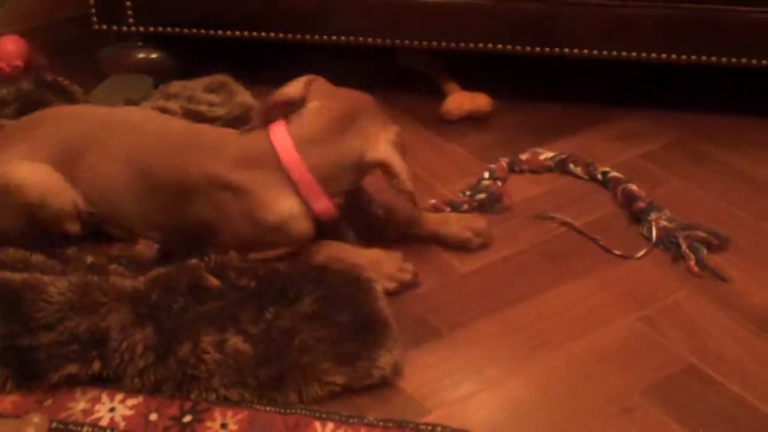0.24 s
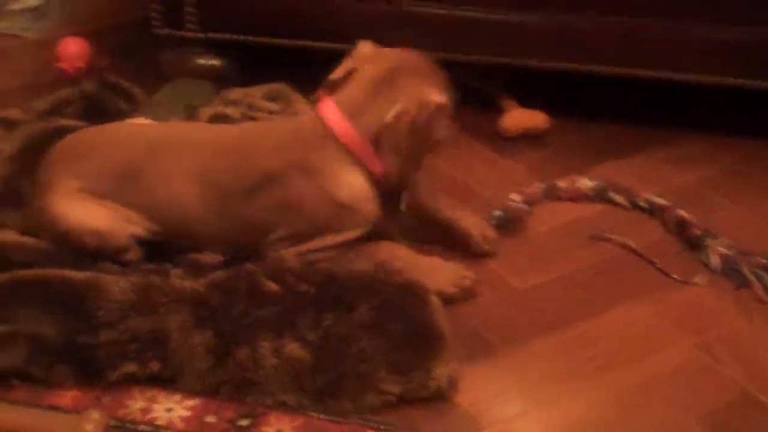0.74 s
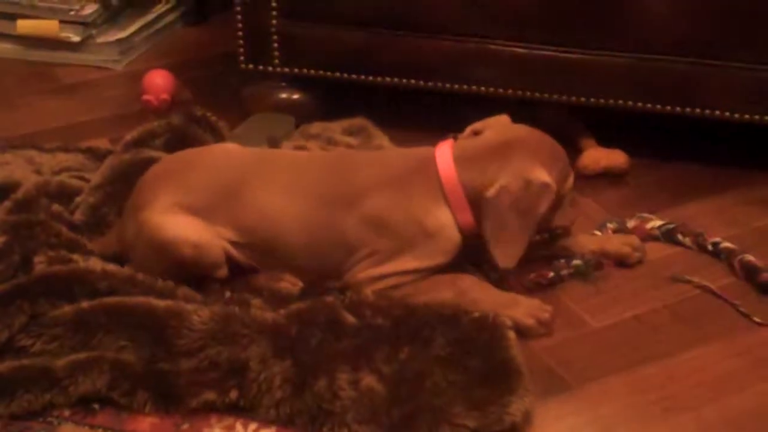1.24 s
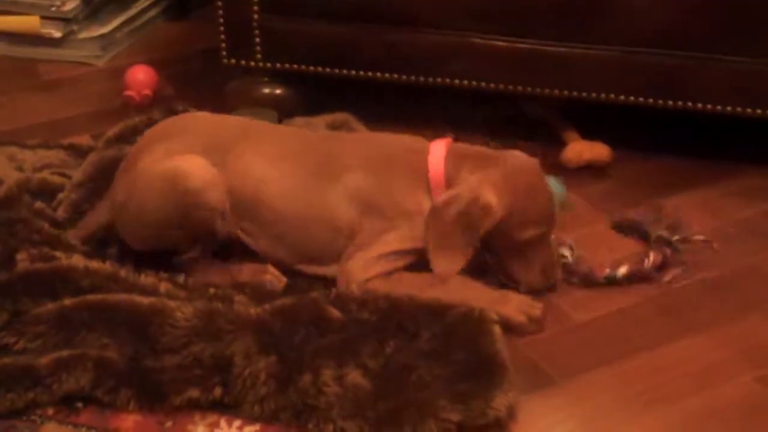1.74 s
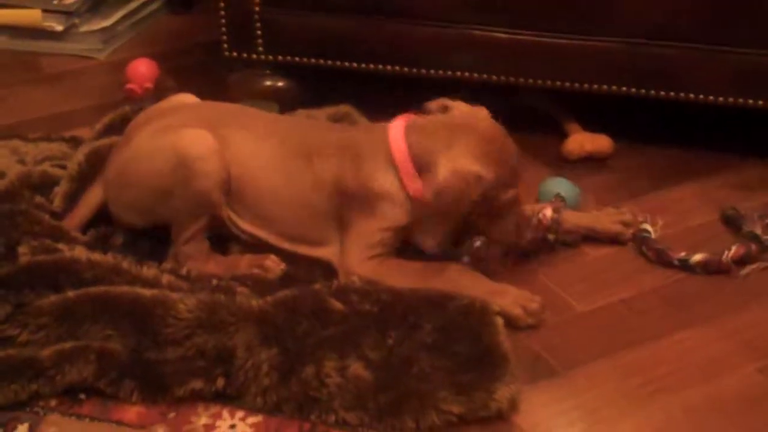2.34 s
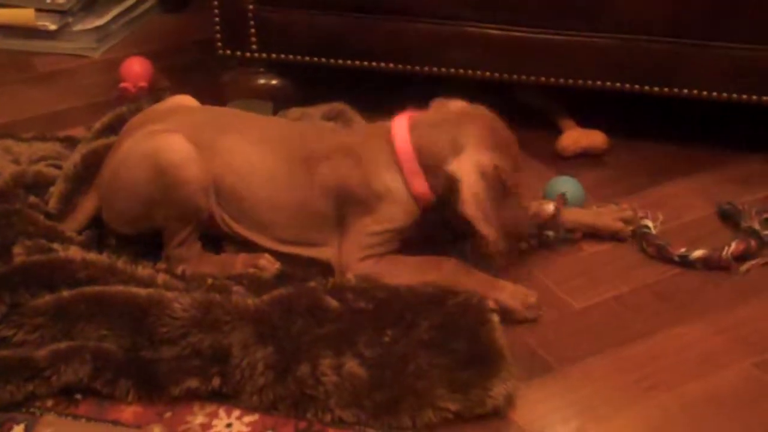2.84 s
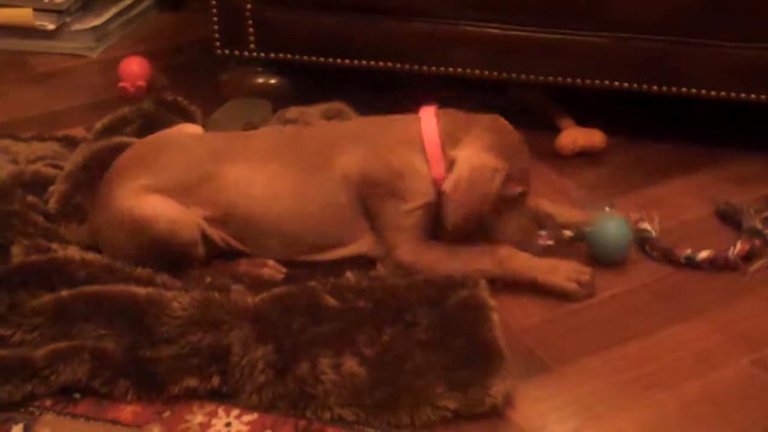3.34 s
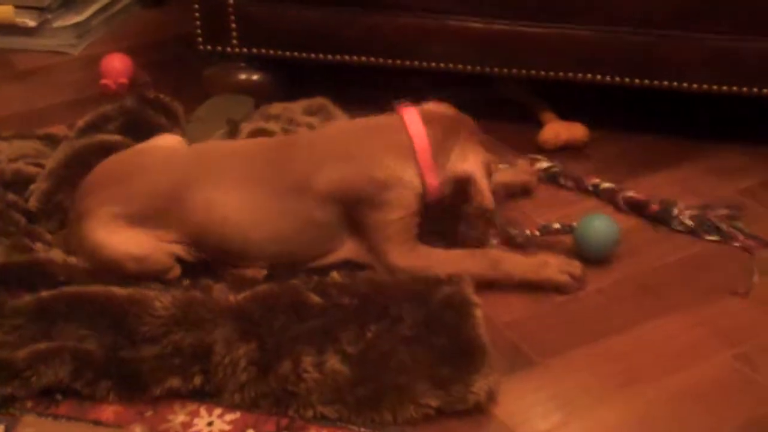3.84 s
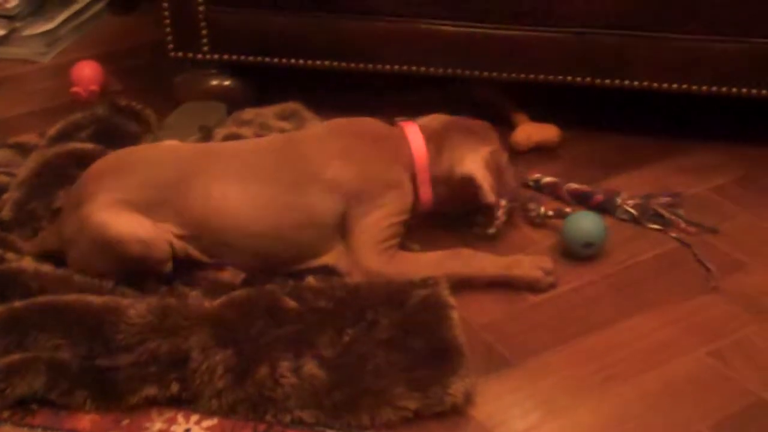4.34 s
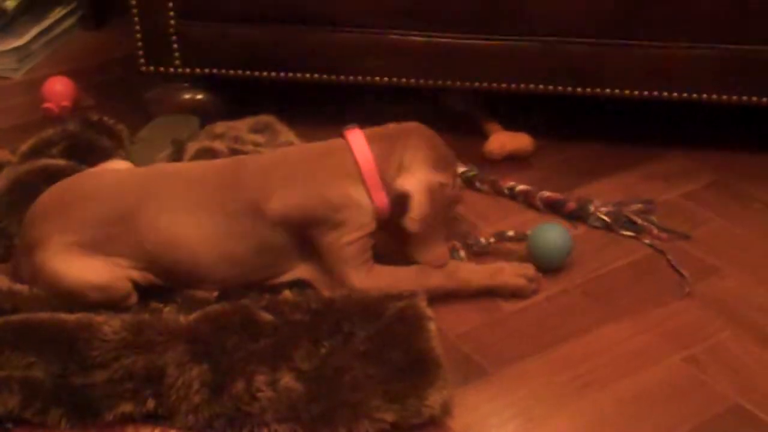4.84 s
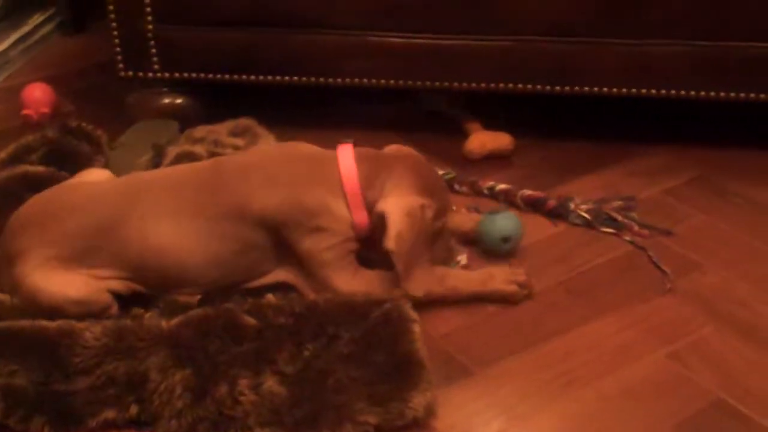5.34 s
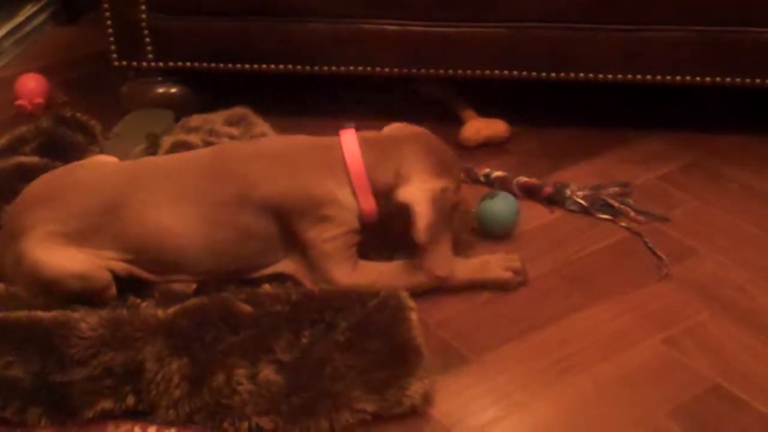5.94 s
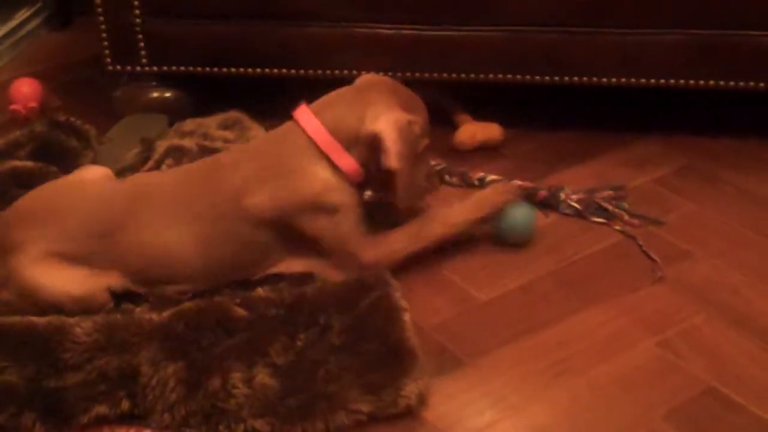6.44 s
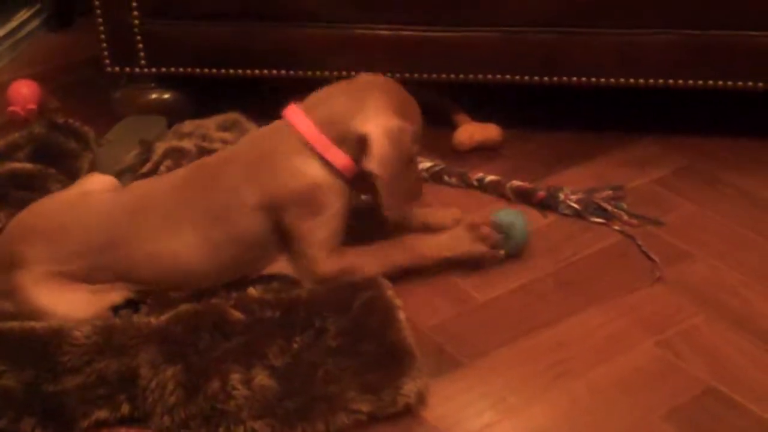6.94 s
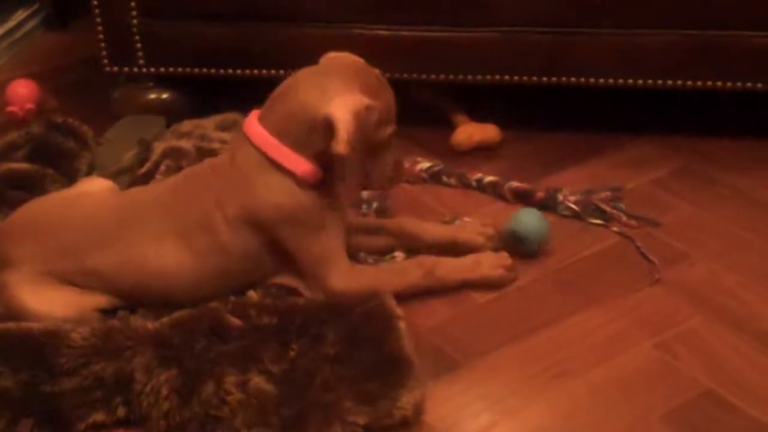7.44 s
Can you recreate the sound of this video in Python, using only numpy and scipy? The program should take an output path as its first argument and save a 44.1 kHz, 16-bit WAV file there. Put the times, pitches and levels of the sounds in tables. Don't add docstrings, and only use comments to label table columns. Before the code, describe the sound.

A puppy wriggles on a fur blanket a metre or two from the microphone. A sharp hard-ball knock comes almost at once, then busy rustling surges with raps, claw ticks and scrapes on floorboards. It thins midway, picks up in gentler bursts, swells once more after six seconds and fades to small taps. Small furnished room, low rumble and hiss.

```python
import sys
import numpy as np
from scipy import signal
from scipy.fft import rfft, irfft
from scipy.io import wavfile
from scipy.ndimage import uniform_filter1d

SR = 44100
rng = np.random.default_rng(int(sys.argv[2]) if len(sys.argv) > 2 else 0)


def ratio(d):
    e = np.asarray(d, float) / 20
    return 10 ** e


def unload_audio(sound):
    columns = np.transpose(np.atleast_2d(sound))
    steps = np.round(np.clip(columns, -1, 1) * 32767)
    wavfile.write(sys.argv[1], SR, steps.astype(np.int16))


N = 339129
CALM_DB = -55


def colour(x, points):
    hz, db = np.transpose(points)
    f = np.maximum(np.fft.rfftfreq(len(x), 1 / SR), 1)
    level_db = np.interp(np.log(f), np.log(hz), db)
    y = irfft(rfft(x) * ratio(level_db), len(x))
    return y / np.sqrt(np.mean(y ** 2))


def band(x, edge_hz, kind, order=6):
    y = signal.sosfilt(signal.butter(order, edge_hz, kind, fs=SR, output="sos"), x)
    return y / np.sqrt(np.mean(y ** 2))


def walk(rate_hz):
    hold = int(SR / rate_hz)
    steps = np.repeat(rng.standard_normal(N // hold + 1), hold)
    return 0.54 * uniform_filter1d(uniform_filter1d(steps, hold), hold)[:N]


def moves(table, t, rise_s, fade_s):
    start_s, hold_s, db, fur_db = np.transpose(table)[:, :, None]
    fading_s = np.maximum(t - start_s - rise_s - hold_s, 0)
    shape = np.clip((t - start_s) / rise_s, 0, 1) * np.exp(-fading_s / fade_s)
    return np.sum((shape * ratio([db, db + fur_db])) ** 2, axis=1)


def effort():
    # (time [s], rubbing level [dB])
    restless = [(0.0, -48.5), (0.9, -50), (1.5, -48.5), (2.5, -52), (2.96, -58), (3.42, -63), (3.62, -56.5),
                (4.2, -53), (5.2, -53), (6.0, -58.0), (6.9, -52), (7.35, -59.5), (7.69, -57.5)]
    # (start [s], hold [s], level [dB], fine fur relative to it [dB])
    wriggles = [(0.015, 0.002, -57, 6.5), (0.121, 0.15, -51, -2), (0.382, 0.24, -45.5, -1),
                (0.675, 0.17, -47, -4.5), (0.892, 0.14, -45, -5), (1.209, 0.12, -46.5, -4.4),
                (1.482, 0.119, -48.5, -3), (1.719, 0.0049, -47, -1.5), (1.939, 0.052, -44.5, -2),
                (2.056, 0.15, -43.5, -3.9), (2.578, 0.26, -56, -9), (2.935, 0.091, -52, -5),
                (3.036, 0.1, -47, -4.2), (3.195, 0.0036, -41.5, -5), (3.661, 0.15, -50, -7),
                (3.828, 0.173, -53.6, -2.5), (4.181, 0.103, -49.5, -4.1), (4.39, 0.033, -53, -2.5),
                (4.592, 0.212, -58.4, -7.9), (4.835, 0.031, -49, -5), (5.002, 0.098, -55, -2),
                (5.264, 0.181, -53.5, -3.5), (5.592, 0.16, -47, -5), (6.142, 0.11, -47, -3.2),
                (6.286, 0.1, -42, -3), (6.482, 0.07, -46.5, -5.5), (6.631, 0.025, -50, -3),
                (6.896, 0.026, -54, -4), (7.131, 0.051, -63.8, 2.5), (7.321, 0.16, -59.5, -1.5)]
    # (start [s], hold [s], level [dB], fine fur relative to it [dB])
    jerks = [(0.168, 0.0027, -57, -14.0), (0.21, 0.021, -54, -4), (0.578, 0.012, -46, 1.5),
             (0.632, 0.0023, -45.5, 0), (0.754, 0.01, -49.5, 2.5), (0.856, 0.009, -56, 4.0),
             (1.693, 0.0037, -60.5, 8), (1.871, 0.051, -50, -1), (2.39, 0.0048, -54.5, 2.5),
             (2.522, 0.0086, -53.5, -3), (2.588, 0.065, -55.2, -2), (2.685, 0.00029, -54, -7.0),
             (2.799, 0.03, -50, -10), (2.903, 0.0046, -72, 6.5), (3.416, 0.008, -57, -5),
             (3.553, 0, -62, -1), (4.278, 0.0087, -50.5, 0.5), (4.744, 0.009, -57, -5),
             (4.795, 0.028, -53.5, -0.5), (5.334, 0.038, -55.5, -1.4), (5.531, 0.064, -54, -3),
             (5.887, 0.0035, -63, -14.0), (5.947, 0.03, -59, -19), (6.027, 0.01, -57.1, -11.5),
             (6.101, 0.01, -57, -5), (7.04, 0.013, -57.5, -4), (7.245, 0.017, -56, -14.0),
             (7.599, 0.0091, -57.9, -11)]
    t = np.arange(0, N / SR, .002)
    rest_db = np.interp(t, *np.transpose(restless))
    rest_fur_db = rest_db - 6.5 + 0.21 * (rest_db - CALM_DB)
    power = ratio([rest_db, rest_fur_db]) ** 2
    power = power + moves(wriggles, t, rise_s=0.071, fade_s=0.066)
    power = power + moves(jerks, t, rise_s=0.032, fade_s=0.022)
    return [np.interp(np.arange(N) / SR, t, 10 * np.log10(p)) for p in power]


def tugs(per_s, fade_s):
    kicks = (rng.random(N) < per_s / SR) * rng.random(N)
    y = signal.lfilter([1], [1, -np.exp(-1 / (fade_s * SR))], kicks)
    return (y - y.mean()) / y.std()


def fibres(per_s, scatter_db, bed_db):
    # (frequency [Hz], level [dB per Hz])
    blanket_tone = [(60, -40), (100, -23.5), (260, -13), (380, -6), (495, -10), (620, -6), (735, -3.5),
                    (1060, -2.5), (1270, -5), (1800, -1.5), (3250, -1.5), (5200, -6), (8400, -6),
                    (14000, -7.5)]
    slips = rng.random(N) < per_s / SR
    sizes = ratio(scatter_db * np.minimum(rng.exponential(size=N), 3))
    snaps = slips * np.clip(rng.standard_normal(N), -2.5, 2.5) * sizes
    snaps = snaps / np.sqrt(np.mean(snaps ** 2))
    return colour(snaps + ratio(bed_db) * rng.standard_normal(N), blanket_tone)


def blanket():
    drag_top_hz, fur_low_hz, sheen_low_hz = 500, 4700, 9700
    rub_db, fur_db = effort()
    drag_db = rub_db - 18 - 0.27 * (rub_db - CALM_DB)
    grip_db = -.6 + .5 * walk(22.46) + 0.22 * walk(70) + .65 * tugs(40, 0.0096)

    coarse = fibres(3000, 2.0, 6.5)
    fine = fibres(5000, 1.2, 2.4)
    heavy = fibres(800, 4.1, 1.7)
    brush = 0.5 * coarse[::-1] + fine

    drag = band(heavy, drag_top_hz, "lowpass") * ratio(drag_db + 4.1 * walk(14))
    rub = band(coarse, (drag_top_hz, fur_low_hz), "bandpass", order=3)
    rub = rub * ratio(rub_db - 0.1 + 0.85 * walk(19))
    low = signal.sosfilt(signal.butter(2, 1700, fs=SR, output="sos"), rub)
    rub = low * ratio(3.3 * walk(10)) + (rub - low) * ratio(1.03 * walk(15))
    fur = band(brush, (fur_low_hz, sheen_low_hz), "bandpass", order=3)
    fur = fur * ratio(fur_db + 0.1 + 0.58 * walk(25))
    sheen = band(fine[::-1], sheen_low_hz, "highpass", order=3)
    sheen = sheen * ratio(fur_db + 1 + 3.6 * walk(45))
    return ratio(grip_db) * (drag + rub + fur + sheen)


def rumble_and_hiss():
    # (frequency [Hz], level [dB per Hz])
    air_tone = [(20, 3.5), (60, -1), (150, -5), (400, -11.5), (1500, 2.5), (5000, -19.5), (14000, -11.5)]
    return ratio(-64.5) * colour(rng.standard_normal(N), air_tone)


def hits(table, rise_s, scrape, width):
    out, t = np.zeros(N + SR // 4), np.arange(SR // 4) / SR
    for s, peak_db, hz, t60_s in table:
        fade = (1 - np.exp(-t / rise_s)) * np.exp(-np.log(1000) * t / t60_s)
        edges_hz = hz / (1 + width), hz * (1 + width)
        scrape_band = signal.butter(2, edges_hz, "bandpass", fs=SR, output="sos")
        grit = signal.sosfilt(scrape_band, rng.standard_normal(len(t)))
        blow = fade * (np.sin(2 * np.pi * hz * t) + scrape * grit / grit.std())
        i = int(s * SR)
        out[i:i + len(t)] += ratio(peak_db) * blow / np.abs(blow).max()
    return out[:N]


def ringing(table, t60_s):
    return [(*row, t60_s) for row in table]


def knocks():
    # (time [s], peak [dB], pitch [Hz])
    raps = [(.151, -36, 2600), (.228, -36, 3840), (.464, -34, 2300), (.589, -35, 3000), (.639, -32.5, 2680),
            (.662, -34, 2180), (1.119, -42, 2260), (1.277, -34, 2690), (1.59, -39, 1940),
            (1.645, -34, 1870), (1.799, -32.5, 3500), (2.407, -49, 2860), (2.829, -40, 2710),
            (2.833, -36, 2390), (2.844, -47, 2530), (3.096, -38, 3000), (3.208, -32, 1740),
            (3.251, -31, 3400), (3.504, -46.5, 1260), (3.677, -47, 1800), (4.229, -36.5, 2460),
            (4.356, -43, 1050), (4.773, -40, 1840), (4.886, -42, 3000), (5.333, -50, 1770),
            (5.975, -47, 1860), (6.057, -46, 816), (7.649, -47, 3570), (7.672, -44, 1080)]
    return hits(ringing(raps, t60_s=0.021), rise_s=.001, scrape=2, width=.6)


def floorboards():
    # (time [s], peak [dB], pitch [Hz], t60 [s])
    landings = [(0.19, -52, 205, 0.091), (0.6, -67, 229, 0.08), (1.038, -62, 91.5, 0.08),
                (2.607, -82, 206, 0.08), (3.298, -61, 212, 0.052), (3.435, -63, 127, 0.1),
                (3.509, -68, 118, 0.08), (6.096, -55.5, 198, 0.063), (6.325, -62, 198, 0.08),
                (6.693, -61, 212, 0.061), (7.647, -60, 215, 0.099)]
    return hits(landings, rise_s=0.0025, scrape=0.46, width=0.99)


def hard_ball():
    # (time [s], peak [dB], pitch [Hz], t60 [s])
    contacts = [
        (.1932, -26, 1400, .009),
        (.1932, -40, 2400, .004),
        (.1950, -41, 1250, .03),
        (3.0775, -35, 5350, .012),
        (3.0776, -37, 6300, .01),
        (.2030, -34, 1400, .03),
        (3.4359, -33.5, 1600, .005),
        (3.4361, -41, 900, .009),
    ]
    return -hits(contacts, rise_s=.0002, scrape=.15, width=1)


def thuds():
    # (time [s], peak [dB], pitch [Hz], t60 [s])
    paws = [
        (0.194, -46, 420, 0.08),
        (2.606, -46, 790, 0.034),
        (2.622, -42.5, 610, 0.062),
        (3.725, -50, 720, 0.06),
        (3.772, -49, 450, 0.037),
        (4.295, -44.5, 683, 0.15),
        (5.364, -53, 483, 0.049),
        (7.068, -49.5, 635, 0.038),
        (7.65, -53, 404, 0.082),
    ]
    return hits(paws, rise_s=0.0046, scrape=0.7, width=1.0)


def ticks():
    # (time [s], peak [dB], pitch [Hz])
    taps = [(.2312, -32, 6300), (.4529, -34, 7450), (.464, -42, 6300), (.8776, -30.5, 5900),
            (1.514, -40, 7500), (1.9035, -35, 7470), (2.14, -40, 6930), (2.4169, -42, 5490),
            (2.6494, -42, 8350), (2.7921, -45, 8520), (2.9307, -47, 7710), (2.987, -39.5, 8280),
            (3.0765, -38, 4960), (3.248, -37, 4900), (3.4436, -48, 6260), (3.7214, -43, 7000),
            (4.889, -43, 4500), (5.0584, -42, 8490), (5.3194, -44, 6330), (5.3908, -35, 8200),
            (6.9474, -40, 9640), (7.4784, -43, 7590), (7.5453, -46, 8720), (7.6256, -43, 5950)]
    return hits(ringing(taps, t60_s=0.02), rise_s=0.0004, scrape=2, width=.4)


def strokes():
    # (time [s], peak [dB], pitch [Hz], t60 [s])
    sweeps = [(.61, -40, 2200, .15), (1.0, -41, 1490, .25), (1.04, -43, 4500, 0.25), (2.2, -60, 1120, 0.19),
              (2.71, -49, 1770, .12), (3.11, -44, 2800, .15), (3.26, -45, 2400, 0.16),
              (3.27, -57, 910, 0.092), (4.3, -51, 1510, 0.18), (4.885, -40, 3300, 0.22),
              (4.89, -45.5, 1100, 0.17), (5.7, -46, 790, 0.34), (5.78, -46.5, 880, 1),
              (6.33, -46, 880, 0.4), (6.42, -42, 1100, 0.18)]
    return hits(sweeps, rise_s=0.0053, scrape=30, width=0.6)


def room(x, wet_db):
    t60_s, first_wall_s = 0.29, .006
    t = np.arange(SR // 2) / SR
    tail = rng.standard_normal(len(t)) * np.exp(-np.log(1000) * t / t60_s) * (t > first_wall_s)
    tail = band(tail, 9000, "lowpass") / np.sqrt(len(t))
    return x + ratio(wet_db) * signal.fftconvolve(x, tail)[:N]


def scene():
    cloth = room(blanket(), wet_db=-19)
    sharp = np.roll(knocks() + ticks(), int(.0009 * SR))
    floor = sharp + floorboards() + hard_ball() + thuds() + strokes()
    mono = cloth + room(floor, wet_db=-10) + rumble_and_hiss()
    return np.array([mono, mono])


def band_limit(x):
    return signal.sosfilt(signal.butter(12, 14000, fs=SR, output="sos"), x)


def record(dry):
    # (frequency [Hz], width [Hz], lift [dB])
    nooks = [(195, 32, 2.5), (302, 55, 1.5), (387, 180, -1.5), (544, 22, -0.5), (727, 39, 3),
             (1080, 120, 2.5), (1783, 42, 3.5), (2070, 130, 0)]
    top_hz, offset = 14000, -.0004
    f = np.fft.rfftfreq(N, 1 / SR)
    lift_db = sum(db / (1 + (2 * (f - hz) / width) ** 2) for hz, width, db in nooks)
    heard = irfft(rfft(dry) * ratio(lift_db) * (f < top_hz), N)
    return band_limit(heard + offset)


dry = scene()
out = record(dry)
unload_audio(out)
```